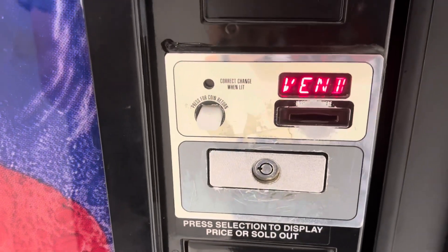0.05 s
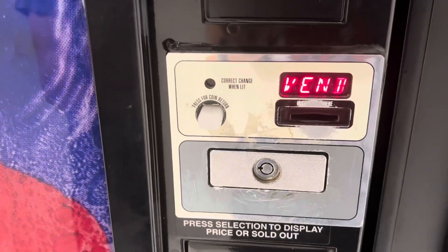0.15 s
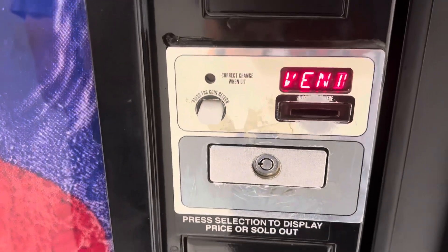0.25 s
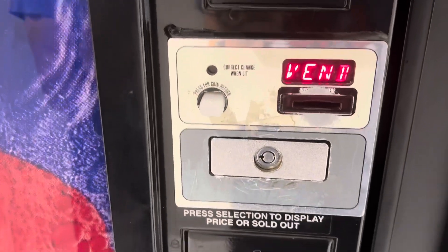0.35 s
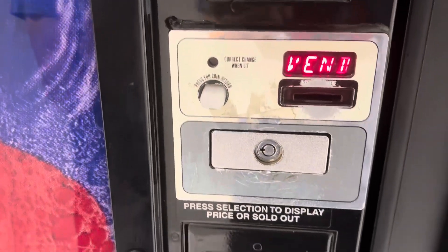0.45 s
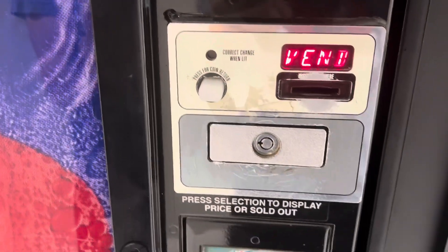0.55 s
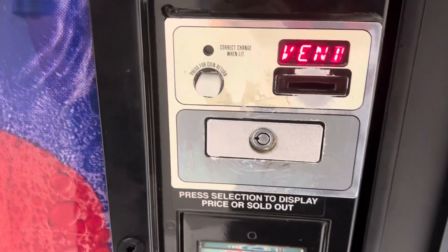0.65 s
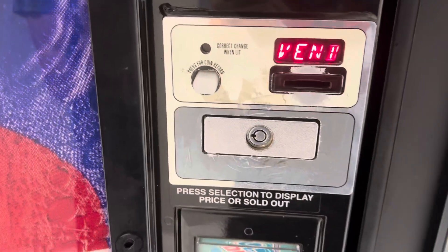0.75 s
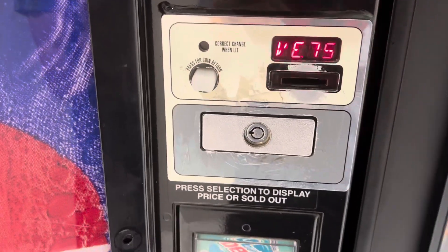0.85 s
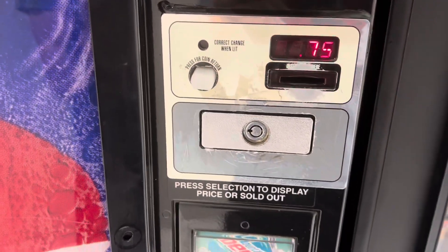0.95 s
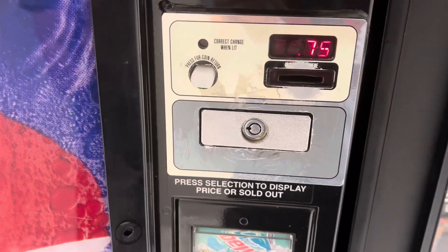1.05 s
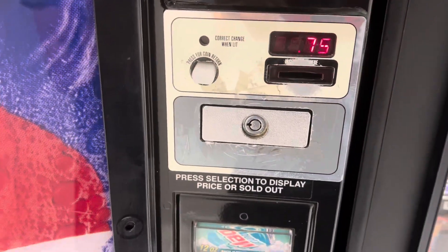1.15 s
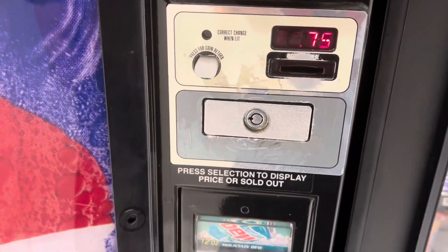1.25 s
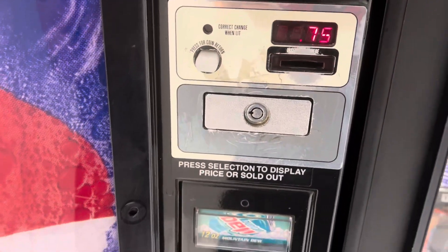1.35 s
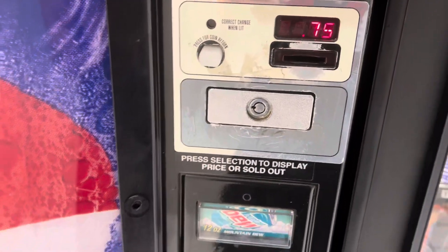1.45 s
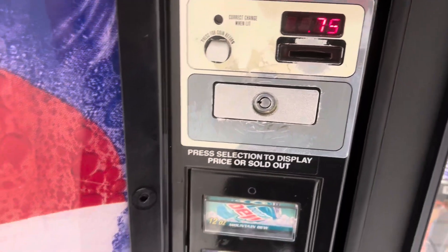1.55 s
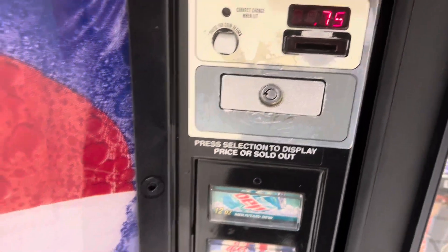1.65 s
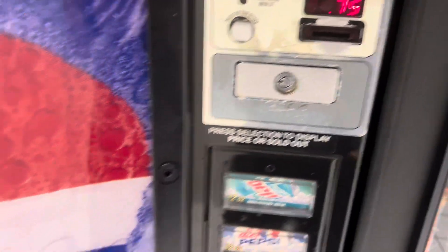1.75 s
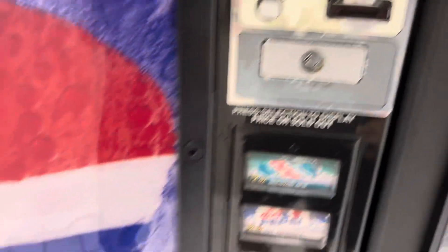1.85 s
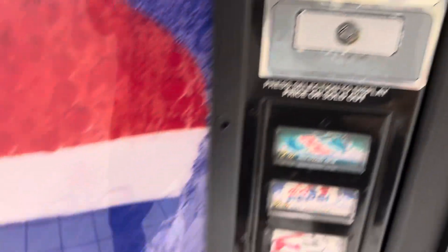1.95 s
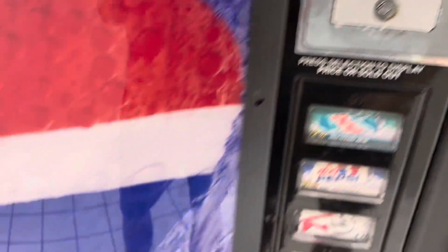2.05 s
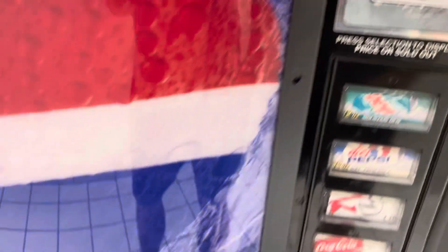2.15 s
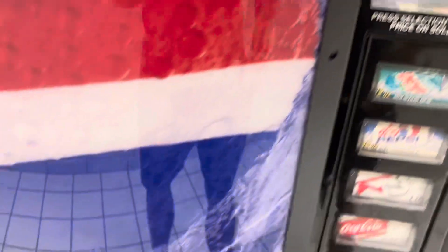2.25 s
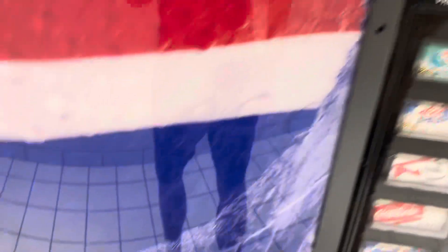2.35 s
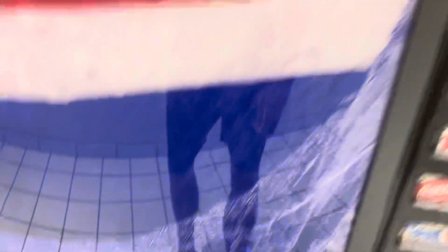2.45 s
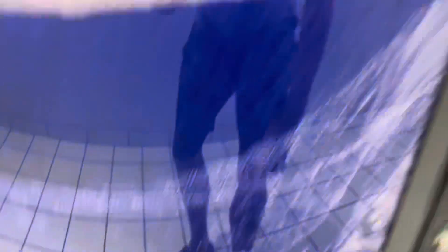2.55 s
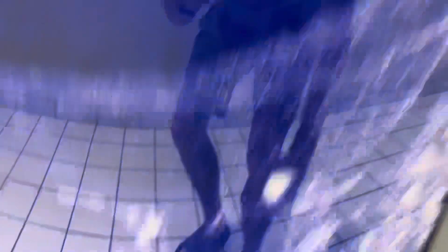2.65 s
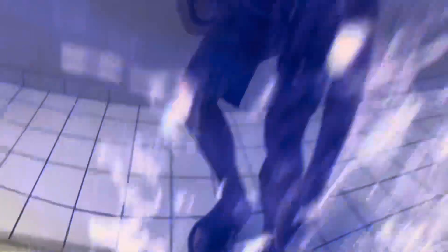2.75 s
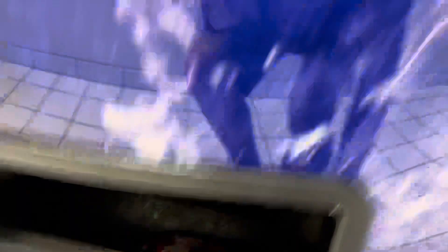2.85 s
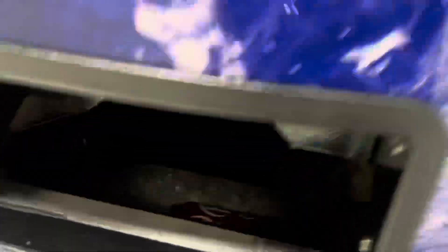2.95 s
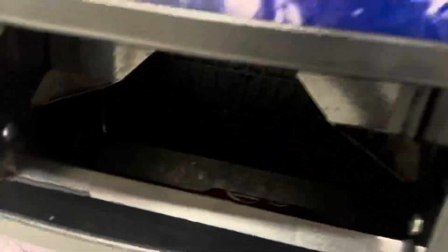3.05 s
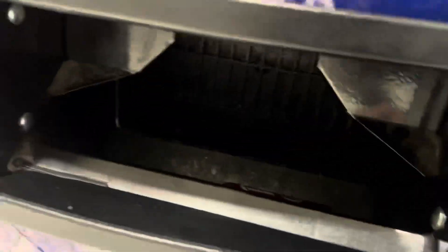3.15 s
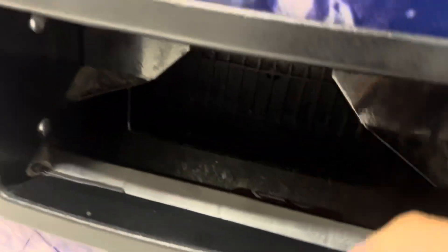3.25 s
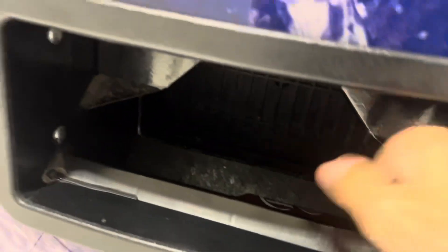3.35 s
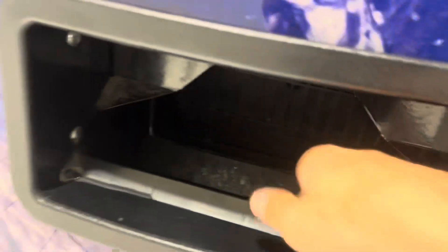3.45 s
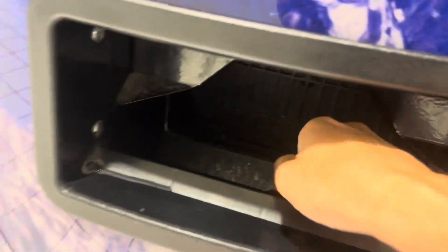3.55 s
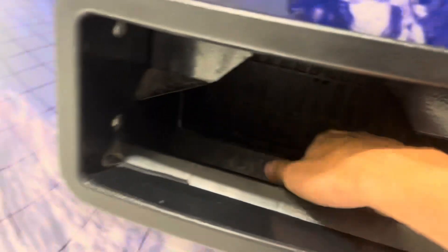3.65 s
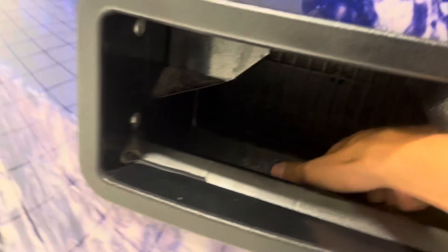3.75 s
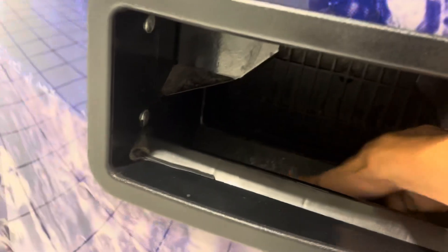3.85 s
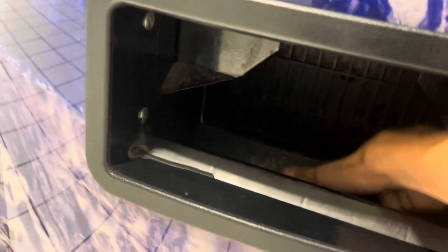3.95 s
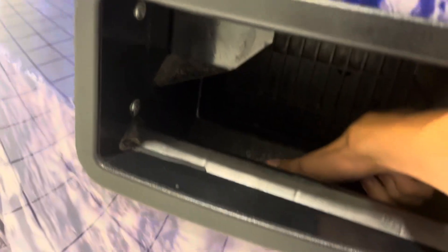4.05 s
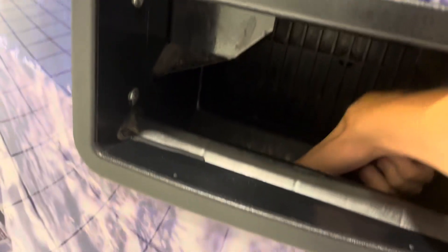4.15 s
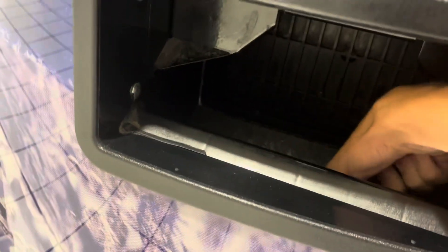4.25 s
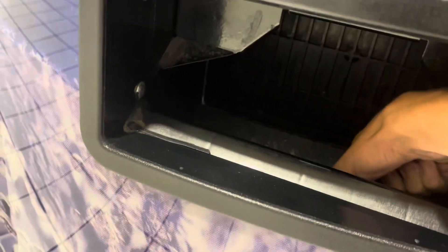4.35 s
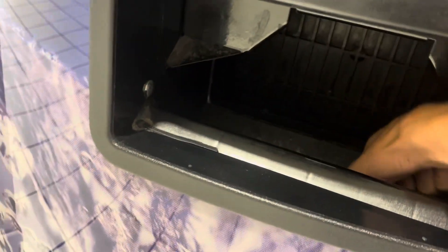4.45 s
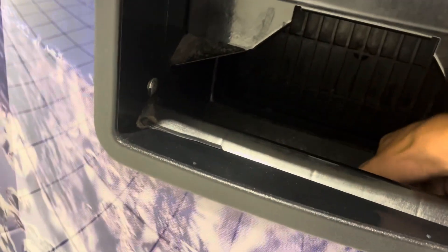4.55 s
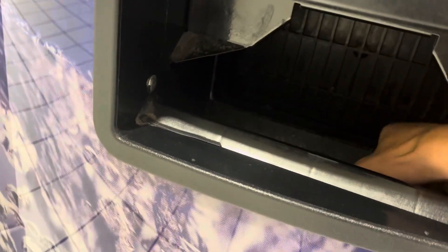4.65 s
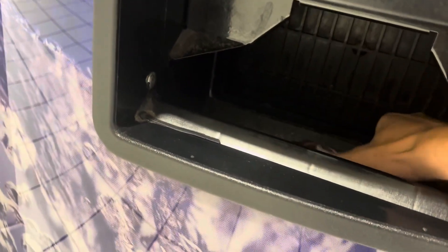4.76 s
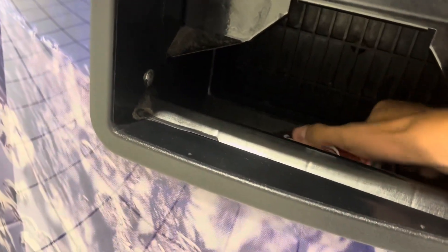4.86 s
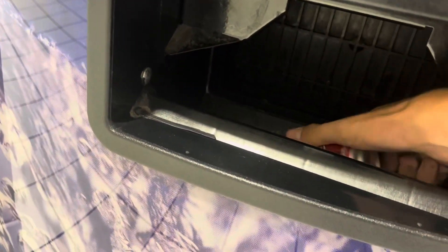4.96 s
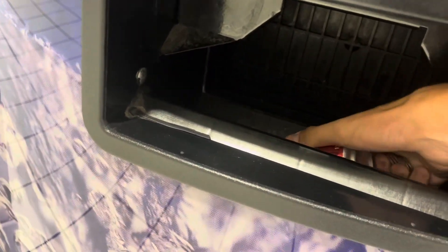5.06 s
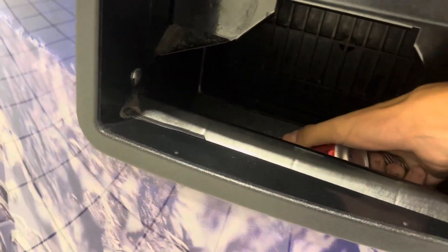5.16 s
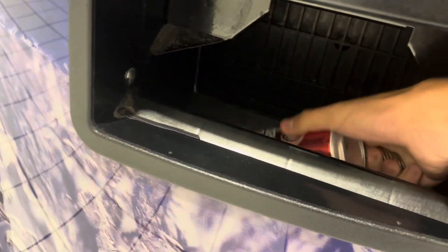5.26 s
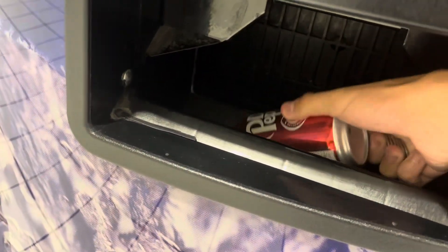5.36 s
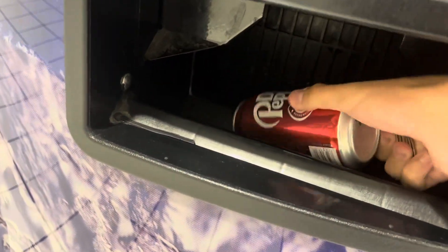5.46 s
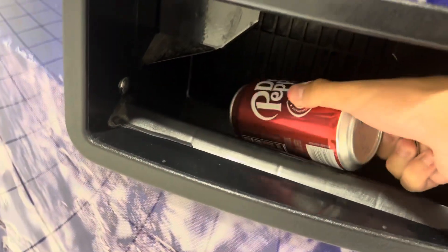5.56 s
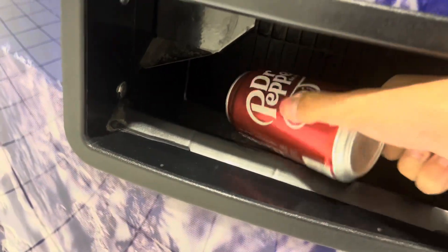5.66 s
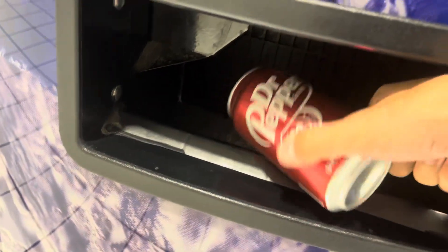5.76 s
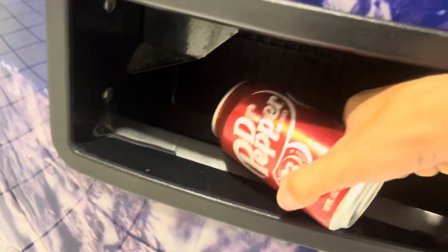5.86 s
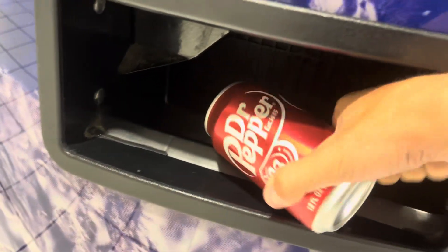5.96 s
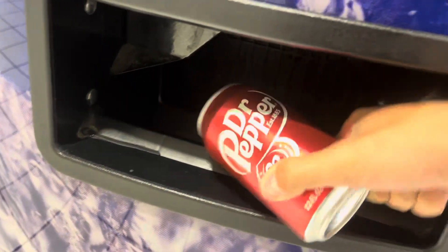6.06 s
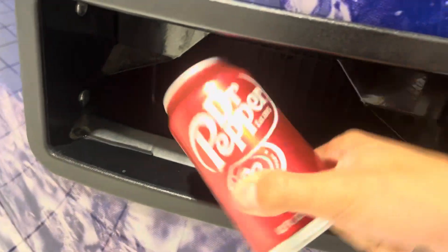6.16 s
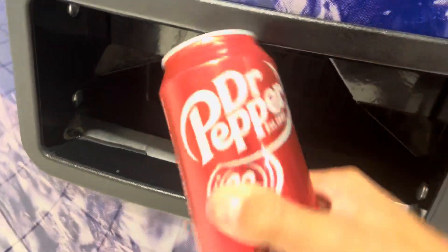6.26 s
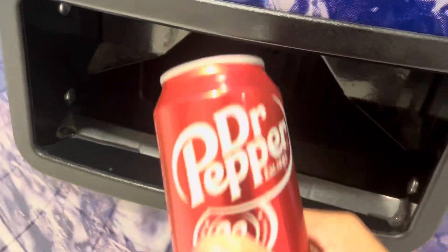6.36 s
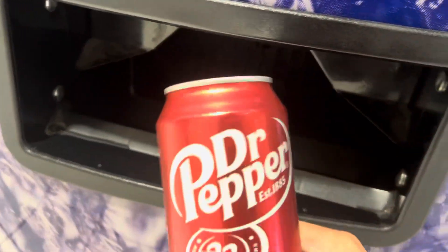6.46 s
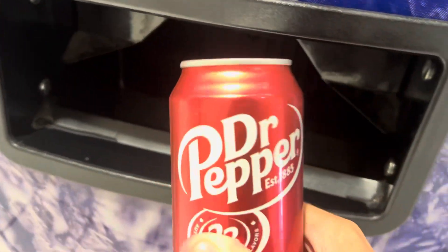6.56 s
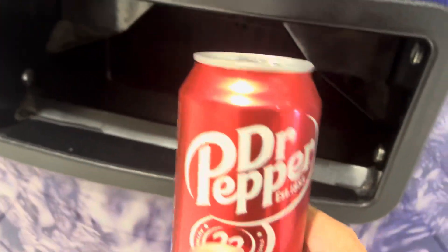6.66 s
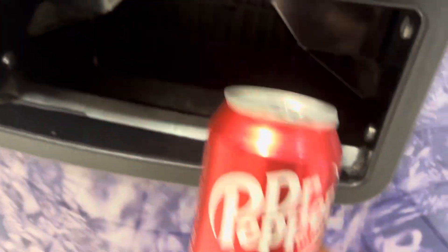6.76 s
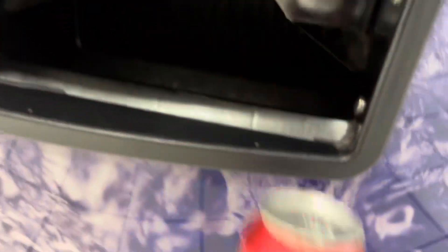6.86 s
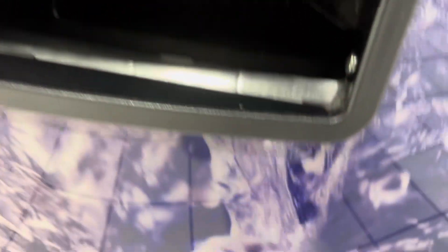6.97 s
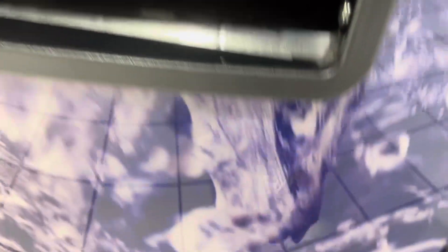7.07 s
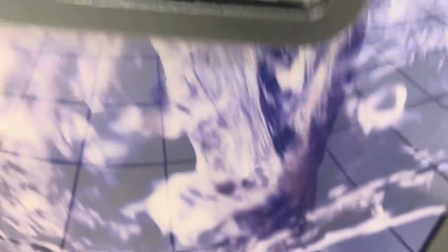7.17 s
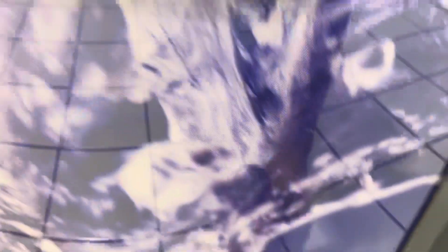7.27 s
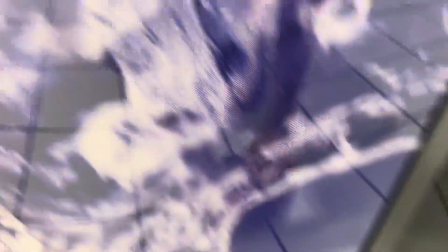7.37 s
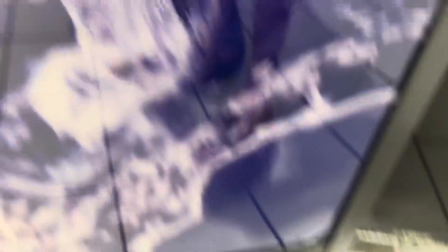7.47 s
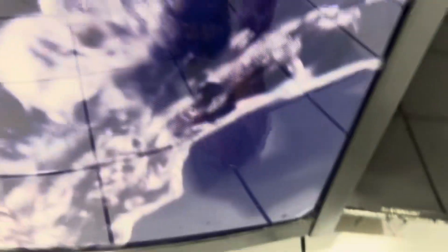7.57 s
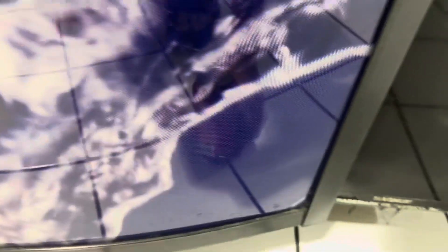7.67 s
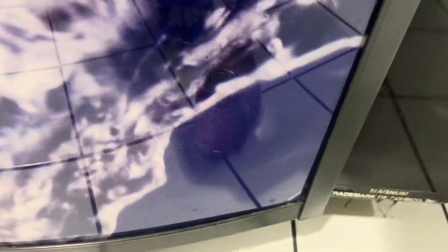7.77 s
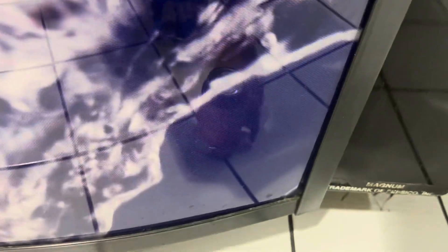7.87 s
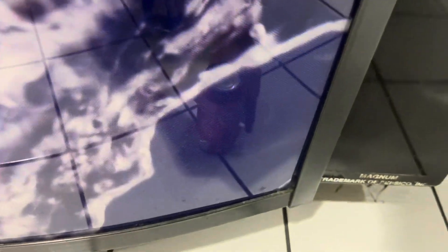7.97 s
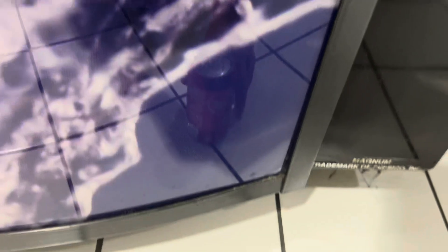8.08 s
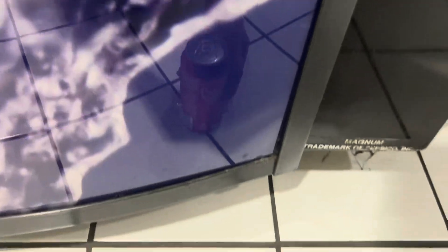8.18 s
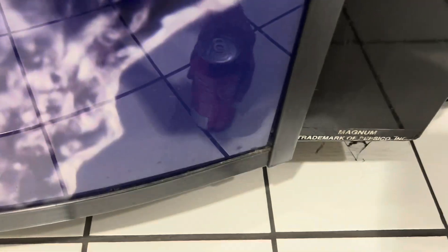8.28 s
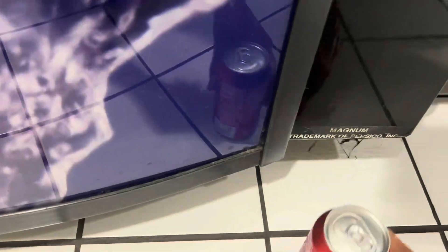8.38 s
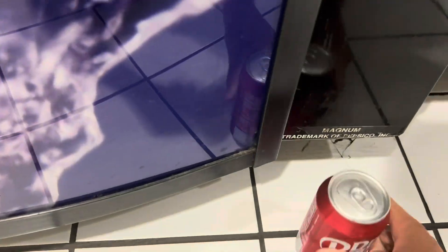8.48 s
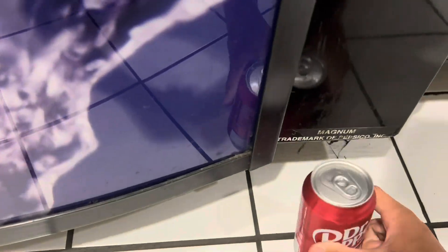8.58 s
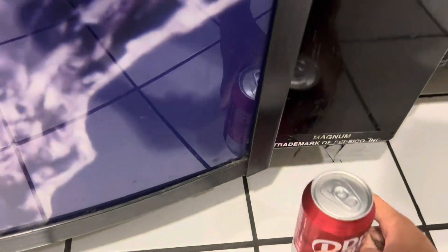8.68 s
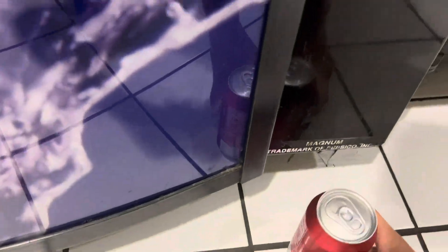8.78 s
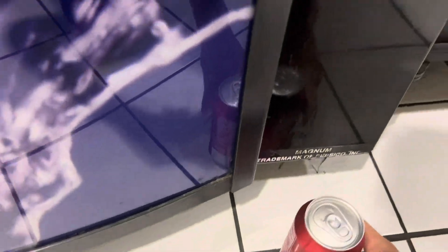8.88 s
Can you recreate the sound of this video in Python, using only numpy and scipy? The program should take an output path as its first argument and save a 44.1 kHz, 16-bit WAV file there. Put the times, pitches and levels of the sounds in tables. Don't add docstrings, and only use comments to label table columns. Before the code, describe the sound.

A drinks machine's low compressor hum and airy fan run throughout, swelling slightly as the listener stoops close to the vent. After about 0.6 seconds of hum alone, a full can tumbles down the chute: heavy hollow thuds and panel clatter, with hard metallic hits at 0.85, 1.0 and 1.15, loose metal rattling, and a weaker bump near 1.5. Then mostly hum with faint ticks until a sharp clank and deep thud at 3.35. Softer knocks come at 3.9 and 4.1 as a hand gropes and rubs. Booming bangs hit at 4.55 to 4.65 and, strongest, 4.95. Duller knocks at 5.85 and 6.25 mark the can being lifted. On tile, it clinks at 7.4, chatters brightly from 7.8 to 8.0, then scrapes and taps lightly from 8.15 to 8.5, with a last small clink near 8.75. Close, dry, handheld stereo sound indoors.

```python
import sys
import numpy as np
from scipy import signal
from scipy.fft import rfft, irfft, next_fast_len
from scipy.io import wavfile
from scipy.ndimage import uniform_filter1d, minimum_filter1d

SR = 44100
rng = np.random.default_rng(int(sys.argv[2]) if len(sys.argv) > 2 else 0)


def boost_factor(decibels):
    exponent = np.asarray(decibels, float) / 20
    return 10 ** exponent


def log_audio(samples):
    frames = np.atleast_2d(samples).T
    limited = np.clip(frames, -1, 1)
    pcm = np.round(limited * 32767).astype(np.int16)
    wavfile.write(sys.argv[1], SR, pcm)


N = 393357

# pitch_hz, level_db (rms), swing_db, crest_m (place in the room)
HUM_TONES = [(59.6, -46, 8.5, 0.69), (119.5, -44, 11.5, 0.33), (236, -45, 2.5, 0.41),
             (291.3, -40.5, 3, 0.48), (350.8, -45, 4, -0.187)]
# freq_hz, density_db (per Hz)
AIR_SPECTRA = [
    [(15, -43.5), (25, -15), (119, -6), (168, -10.5), (243, -11.5), (297, -17), (364, -14), (419, -23.5),
     (520, -23.5), (680, -45), (1140, -120)],
    [(280, -27), (480, -14), (624, -2.5), (714, -0.5), (801, -7), (987, -2), (1280, -3), (1550, -4.5),
     (1710, -6), (2210, -25.5), (2400, -47), (3120, -66), (5280, -120)],
    [(1290, -37.0), (2200, -11.5), (2490, -3.5), (2770, -8), (3400, -4.5), (4120, -11.0), (5050, -13.0),
     (5500, -19.0), (6550, -16.5), (8500, -20.5), (11000, -51), (18700, -120)][:-2] + [(11000, -11),
     (16000, -27)],
]
# level_db, nearness_share (dB gained per dB of nearness)
AIR_LEVELS = [
    (-33.5, 1),
    (-45, 0.24),
    (-57.5, 0.58),
]
# freq_hz, likeness (0 to 1)
AIR_LIKENESS = [(60, 1), (400, 0.88), (700, 0.58), (1400, 0.31), (2000, 0.92), (4500, 0.8), (7500, 1),
                (12000, .4)]
# freq_hz, left_lead_rad
FAN_LEAD = [(700, -0.18), (1000, -0.5), (1500, -4.5), (1900, 0.32)]
# freq_hz, left_minus_right_db
FAN_LEAN = [(600, 0), (1400, 5), (2000, 6.5), (2800, -0.5), (4000, 4.5), (6000, -0.5)]
# time_s, place_m, nearness_db (to the vent)
LISTENER_PATH = [(0, 0.04, -2.5), (1.6, 0.18, -4), (2.3, 0.34, -2.5), (2.75, 0.15, -1), (3.2, 0.47, -0.5),
                 (4.2, 0.45, 2.5), (5.8, 0.56, -1), (6.5, 0.53, -1), (7.2, 0.39, -0.5), (8, 0.29, 1),
                 (8.92, 0.92, 1)]
# start_s, length_s, level_db
RUBS = [
    (0, .01, -50),
    (8.47, .03, -52),
    (4.106, 0.2, -62),
    (5.193, 0.44, -60),
    (6.035, 0.051, -57),
]
# start_s, level_db, pitch_hz
TOUCHES = [(0.002, -36.5, 7500), (2.7178, -36.5, 5260), (2.825, -41.5, 3470), (3.524, -42, 3470),
           (3.5556, -42, 3900), (4.2523, -39.5, 3000), (4.279, -42, 3300), (4.4672, -42, 6900),
           (4.891, -38.5, 4100), (5.3555, -38.5, 3400), (6.0607, -45, 7000), (6.0791, -49, 3500),
           (6.41, -42.5, 3330), (8.599, -37, 3000), (8.712, -45, 5450), (8.488, -37, 4000),
           (8.9164, -35.5, 3250)]
# start_s, level_db, pitch_hz
RINGS = [(.85, -30, 1900), (.875, -27, 920), (.905, -34, 920), (.86, -25, 4800), (.93, -32, 4980),
         (0.996, -16, 1380), (1.03, -23, 2200), (1.142, -25, 620), (3.345, -35, 2120), (3.355, -38, 4400),
         (3.346, -38, 6300), (3.896, -34, 2620), (3.899, -42, 3740), (4.6, -47, 4220), (4.615, -45, 4200),
         (4.675, -44, 4120), (4.797, -30, 2060), (4.94, -16.5, 1627), (6.226, -36, 2410),
         (6.232, -42, 1580), (6.252, -33, 2050), (6.285, -40, 2250), (0.684, -20, 523)]
# start_s, level_db, pitch_hz
SNAPS = [(.925, -25, 8000), (.937, -22, 5000), (1.023, -22, 5000), (1.066, -16, 6500), (1.069, -18, 5500),
         (1.093, -25, 7000), (1.212, -33, 4700), (1.25, -38, 8000), (3.341, -25, 6040), (3.429, -37, 7500),
         (3.503, -37, 4500), (3.8997, -28.5, 3500), (4.892, -34.5, 7100), (4.961, -30, 3000),
         (6.24, -28, 7050), (6.297, -35.5, 7500), (8.4945, -27, 7000), (8.499, -29, 5000),
         (8.503, -28.5, 8200)]
# start_s, level_db, pitch_hz, t60_s
BOOMS = [(.63, -11.5, 259, .2), (0.854, -8, 310, .15), (4.129, -22.5, 385, .2), (4.411, -27.5, 382, .2),
         (4.56, -10, 289, .12), (1.25, -14.5, 385, 0.16), (0.624, -13, 301, .3), (.69, -14, 385, .3),
         (0.664, -12, 330, 0.22), (0.898, -9, 385, 0.14), (0.998, -6, 365.6, 0.45),
         (1.148, -5.5, 393.5, 0.27), (1.481, -20, 395, 0.33), (3.344, -18.5, 333.7, 0.55),
         (3.373, -9, 169.8, 0.2), (3.418, -19, 372, 0.32), (3.896, -13.5, 209.8, 0.29),
         (3.908, -16.5, 326, 0.39), (4.262, -22, 290, 0.22), (4.558, -2, 192, 0.15),
         (4.575, -11, 209.8, 0.39), (4.647, -4.5, 425, 0.12), (4.662, -17.5, 308, 0.18),
         (4.797, -13.5, 264.5, 0.17), (4.943, 2, 308.8, 0.29), (4.559, -4, 378, 0.17),
         (4.977, 0.5, 285, 0.21), (4.999, -10.5, 425, 0.4), (4.815, -15, 369, 0.11),
         (5.839, -13, 277, 0.24), (6.223, -13, 270.4, 0.41), (6.271, -22, 291, 0.083)]
# start_s, level_db, pitch_hz
THUDS = [(0.651, -17.5, 124), (0.852, -13, 131), (.962, -9, 119), (1.054, -10.5, 111.2), (4.563, -18, 96.3),
         (4.974, -16, 89.6), (5.035, -17.5, 80), (0.996, -7.5, 168.6), (1.151, -12.5, 132.7),
         (1.482, -19.5, 112.3), (3.347, -8.5, 69), (3.392, -7.5, 60.4), (3.454, -14, 62.9),
         (4.573, -30.5, 157), (4.643, -17.5, 95.5), (4.661, -14, 73), (5.002, -9.5, 77),
         (5.843, -18, 141.4), (6.23, -18.5, 106)]
# freq_hz, width_hz, level_db
CABINET_MODES = [(61, 6.5, -1.5), (80, 41, 11.5), (129.5, 32, 12.5), (170, 76, -2.5), (194.7, 20, 7),
                 (248.2, 29, -1), (297.2, 15.6, 11), (313.3, 66, 3), (385, 8.3, 11.5), (425, 12, -9),
                 (486, 54, -7.5)]
# freq_hz, width_hz, level_db
PANEL_MODES = [(670, 48, 13), (923, 9.7, 15.5), (1450, 58, -3), (1900, 54, -16)]
# freq_hz, width_hz, level_db
FLAP_MODES = [(920, 29, 6.5), (1550, 75, -3), (1904, 47, -4), (2420, 32, -3.5), (4700, 65, -14),
              (5200, 80, -10.5), (6120, 86, -15.5), (7940, 170, -6.5)]
# start_s, contact_s, shake_db, clatter_db, rattle_db
BUMPS = [(0.604, 0.069, -22, -26.5, -43), (0.84, 0.0074, -16.5, -36.5, -19.5), (0.9, 0.029, -25, -37, -25),
         (1, 0.054, -11, -22.5, -22.5), (1.049, 0.019, -28.5, -30.5, -28), (1.124, 0.073, -25, -32.5, -47),
         (1.2, 0.018, -27, -48, -38), (0.642, 0.057, -28, -28, -49.5), (4.96, 0.039, -21, -33.5, -46),
         (3.36, 0.053, -31, -40, -49), (1.254, 0.012, -21.5, -56, -35.5), (1.46, 0.012, -36, -58, -48.5)]
# rise_s, fall_db_per_s
BUMP_ANSWER = [
    (0.013, 93.5),
    (0.024, 152),
    (0.015, 208),
    (0.041, 105),
]
# freq_hz, density_db (per Hz)
CLATTER_SPECTRUM = [(260, -23.5), (450, -0.5), (684, -5), (827, -9.5), (1060, -8), (1290, -14.5),
                    (1390, -8), (1690, -13), (2600, -26.5), (3380, -37.5), (5720, -120)]
# freq_hz, density_db (per Hz)
RATTLE_SPECTRUM = [(1300, -22.5), (2200, -9), (3300, -4.5), (4400, -4), (5100, -3), (5700, -8),
                   (7600, -4.5), (8600, -4), (16000, -6.5)]
# freq_hz, density_db (per Hz)
TICK_SPECTRUM = [(1500, -23.5), (2300, -4), (4000, -3.5), (5500, -12.5), (8500, -14), (11000, -14),
                 (16000, -17)]
# start_s, tick_db, clack_db, low_ring_hz, high_ring_hz
KNOCKS = [(0.854, -19, -25, 950, 4640), (0.996, -12, -7.5, 695, 1900), (1.1374, -32, -19.5, 1000, 1900),
          (1.2384, -34, -32.5, 970, 4720), (1.47, -39.5, -52, 670, 4230), (3.343, -14.5, -25, 1260, 2040),
          (3.3753, -27.5, -30.5, 785, 1950), (3.412, -32.5, -30.5, 695, 1900),
          (3.4364, -29.5, -33.5, 686, 2620), (3.8941, -38.5, -18.5, 736, 1900),
          (4.125, -54, -31.5, 710, 2240), (4.554, -21.5, -15, 895, 2420), (4.646, -22.5, -16, 740, 2680),
          (4.7947, -27.5, -21, 2213, 1220), (4.9385, -7, -5.5, 1162, 2830), (4.961, -38, -20, 1610, 3000),
          (4.975, -25, -16, 1160, 2520), (4.9992, -61, -21.5, 670, 2430), (5.8364, -32.5, -28, 940, 1950),
          (6.2191, -27, -23.5, 800, 2120), (6.229, -19, -27, 1560, 2110), (6.2694, -35.5, -30, 670, 2200)]
# start_s, body_db, low_ring_db, low_ring_hz, high_ring_db
TILE_TAPS = [(7.393, -22.5, -15, 858, -15.5), (7.42, -26, -26.5, 1540, -24), (7.4381, -26, -22, 880, -37),
             (7.45, -29, -29, 910, -26), (7.462, -32, -33, 1950, -33), (7.47, -30, -38.5, 1950, -31),
             (7.486, -35, -35, 1950, -32), (7.498, -33, -40, 1950, -39), (7.511, -41, -43, 1950, -35),
             (7.788, -15, -18.5, 1950, -16.5), (7.79, -28, -17, 1283, -48), (7.8106, -16, -45, 2120, -23),
             (7.8224, -15, -34, 2100, -29), (7.856, -19, -41, 1950, -39), (7.886, -21, -39, 1290, -33),
             (7.8478, -16, -29, 1950, -18.5), (7.878, -17, -35.5, 1330, -21.5),
             (7.9025, -17, -27, 1280, -31), (7.9265, -21, -29, 1320, -24), (7.9426, -20, -36, 1400, -30),
             (7.958, -23, -33, 1330, -32), (7.967, -29, -39, 1310, -36), (7.975, -33, -41.5, 1310, -39),
             (7.995, -36, -45, 1330, -42), (7.615, -33.5, -44, 1310, -52), (7.6242, -32.5, -48, 1310, -50),
             (8.1496, -40, -47, 1320, -43), (8.195, -32, -35, 1500, -39), (8.2254, -40, -48, 1300, -34),
             (8.2464, -27, -25, 2220, -21), (8.256, -25, -35.5, 1300, -27), (8.362, -24, -46, 1310, -28),
             (8.441, -28, -33, 1290, -46), (8.466, -42, -29.5, 2220, -47), (8.285, -20.5, -19.5, 1350, -22),
             (8.4082, -19.5, -31.5, 1130, -41), (8.482, -40, -18.5, 1245, -33),
             (8.7616, -26, -19, 1240, -56), (8.7837, -39, -25.5, 1310, -42)]
# start_s, length_s, body_db, low_ring_db, high_ring_db
DRAGS = [(7.437, 0.093, -42.5, -51, -49), (7.575, 0.024, -45, -59, -50), (7.832, 0.15, -38.5, -41, -49),
         (7.966, 0.046, -51.5, -50, -57), (8.091, .05, -52, -55, -55), (8.132, 0.24, -46, -49, -50.5),
         (8.197, 0.11, -34, -41, -44), (8.287, 0.019, -31.5, -36.5, -45), (8.314, 0.12, -33.5, -41, -45),
         (8.426, 0.043, -35.5, -31.5, -43.5), (8.738, 0.031, -35.5, -30, -44)]
# freq_hz, width_hz, level_db
CAN_MODES = [(2200, 160, -7), (2615, 80, 3.5), (2817, 210, -2.5), (3800, 250, -8), (4730, 294, 3),
             (5100, 190, 3), (6500, 680, -23), (7650, 400, -26), (12200, 1700, -18), (560, 420, -5),
             (880, 110, -15), (1173, 62, 1.5), (1690, 52, -9.5), (1950, 48, 1)]
# freq_hz, left_lead_rad
PORT_LEAD = [(100, 0.15), (400, 0.38), (700, 0.62), (1400, 1.05), (2000, 0), (2800, 0.81), (4000, 0.38),
             (5000, 0.74), (7500, 0), (8500, -2.5), (9500, -0.5), (12000, -6)]
# freq_hz, left_minus_right_db
PORT_LEAN = [(300, 0.7), (1000, -2), (2000, 0), (2800, 2.5), (4000, 2), (6000, 0.5), (9000, 1)]
# freq_hz, gain_db
STEADY_COLOUR = [(25, -9), (45, -.5), (8500, 0), (9000, -7), (9400, -20), (9700, -40), (10800, -40),
                 (11000, -15), (12500, -14), (14400, -24), (15700, -45)]
# freq_hz, gain_db
ATTACK_COLOUR = [(25, -15), (45, 1), (8500, 1), (9500, -14.5), (10500, -7.5), (12500, -14),
                 (14400, -26), (15700, -51)]

SOUND_M_PER_S = 343
THUD_T60_S, THUD_UNDER_SHAKE_DB = 0.2, -1
VEND_END_S = 1.1
ROLL_FALLING_S, ROLL_HELD_S = 0.46, 0.18
CAN_LOW_HZ, FIRST_RIM_HZ, RIM_HZ = 1312, 5280, 4554
STROKE_RISE_S, STROKE_FALL_DB_PER_S = 0.034, 351
SPARSE_HZ, FAINT_DB, STAND_OUT = 8900, -111, 1.25
SUDDEN_DB, OPEN_S = 11, 0.014


def evened(x):
    return x / np.sqrt(np.mean(x ** 2) + 1e-20)


def peaked(x):
    return x / abs(x).max()


def read(points, hz):
    f, value = np.transpose(points)
    return np.interp(np.log(hz + 1), np.log(f + 1), value)


def add(mix, s, sound):
    part = mix[..., round(s * SR):][..., :sound.shape[-1]]
    part += sound[..., :part.shape[-1]]


def shaped(x, gain):
    size = next_fast_len(x.shape[-1])
    spectrum = rfft(x, size) * gain(np.fft.rfftfreq(size, 1 / SR))
    return irfft(spectrum, size)[..., :x.shape[-1]]


def colour(x, points):
    return evened(shaped(x, lambda hz: boost_factor(read(points, hz))))


def resonate(x, hz, width):
    r = np.exp(-np.pi * width / SR)
    return 2 * signal.lfilter([1 - r], [1, -r * np.exp(2j * np.pi * hz / SR)], x).real


def resonate_twice(x, hz, width):
    return resonate(resonate(x, hz, width), hz, width)


def modes(x, table):
    return sum((-1) ** k * boost_factor(db) * resonate(x, hz, width) for k, (hz, width, db) in enumerate(table))


def pair(same):
    a, b = rng.standard_normal((2, N))
    side = np.sqrt((1 - np.clip(same, 0, 1)) / 2)
    return np.sqrt(1 - side ** 2) * a + side * b * np.array([[1], [-1]])


def grit(per_s, spread_db):
    return boost_factor(spread_db * np.minimum(rng.exponential(1, N), 4)) * (rng.random(N) < per_s / SR)


def strike(t, t60):
    a, b = boost_factor(-60 * t / t60) * rng.standard_normal((2, len(t)))
    return np.array([a + 0.26 * b, a - 0.22 * b])


def strokes(starts, lengths, dbs, rise_s, fall_db_s):
    t, power = np.arange(SR // 2) / SR, np.zeros(N)
    for s, length, db in zip(starts, lengths, dbs):
        rise = np.minimum(t / rise_s, 1) ** 2
        fall = boost_factor(db - fall_db_s * np.maximum(t - length, 0))
        add(power, s, (rise * fall) ** 2)
    return np.sqrt(power)


def ring_out(t, hz, db, t60, turn):
    fade = boost_factor(db - 60 * t / (np.clip(t60, .03, 1) * (300 / hz) ** 0.47))
    return (1 - np.exp(-t * hz * 3.3)) ** 2 * fade * np.sin(2 * np.pi * (hz * t + turn))


def along(column):
    return np.interp(np.arange(N) / SR, *np.transpose(LISTENER_PATH)[[0, column]])


def ports(x, lead, lean):
    half = np.array([[.5], [-.5]])
    return shaped(x, lambda hz: np.exp(1j * half * read(lead, hz)) * boost_factor(half * read(lean, hz)))


def hum():
    t, out, place = np.arange(N) / SR, np.zeros(N), along(column=1)
    for hz, db, swing_db, crest in HUM_TONES:
        gain = boost_factor(db + swing_db * np.cos(2 * 2 * np.pi * hz * (place - crest) / SOUND_M_PER_S))
        waver = sum(np.sin(2 * np.pi * (f * t + rng.random())) / f for f in np.geomspace(.4, 5, 8))
        out += np.sqrt(2) * gain * np.sin(2 * np.pi * (hz * t + 0.15 * waver))
    return out


def fan():
    frames, hz = N // 512 + 5, np.fft.rfftfreq(2048, 1 / SR)
    a, b, c, d, patches = rng.standard_normal((frames, 1025, 5)).T
    patches = evened(uniform_filter1d(uniform_filter1d(patches, 8, 0), 8, 1))
    same = np.clip(read(AIR_LIKENESS, hz), -1, 1)[:, None]
    left = a + 1j * b
    right = same * left + np.sqrt(1 - same ** 2) * (c + 1j * d)
    z = boost_factor(2.34 * patches) * np.array([left, right])
    near_db, out = along(column=2), np.zeros((2, N))
    for spectrum, (db, share) in zip(AIR_SPECTRA, AIR_LEVELS):
        coloured = z * boost_factor(read(spectrum, hz))[:, None]
        layer = signal.istft(coloured, nperseg=2048, noverlap=1536)[1][:, :N]
        out += evened(layer) * boost_factor(db + share * near_db)
    return out


def rubs():
    skin = (1 + evened(uniform_filter1d(grit(200, 3.6), 300))) * pair(.9)
    return strokes(*np.transpose(RUBS), 0.042, 200) * colour(skin, RATTLE_SPECTRUM)


def touches():
    t, out = np.arange(2000) / SR, np.zeros((2, N))
    for s, db, hz in TOUCHES:
        scratch = strike(t, 0.06) * (1 - np.exp(-t / 0.00075))
        edge = peaked(np.diff(scratch, prepend=0))
        add(out, s, boost_factor(db) * peaked(peaked(resonate(scratch, hz, 900)) + .5 * edge))
    for s, db, hz in RINGS:
        add(out, s, boost_factor(db) * peaked(resonate_twice(strike(t, 0.025), hz, 97)))
    for s, db, hz in SNAPS:
        snap = strike(t, .012)
        edge = peaked(np.diff(snap, prepend=0))
        add(out, s, boost_factor(db) * peaked(peaked(resonate(snap, hz, 1400)) + .8 * edge))
    return out


def booms():
    t, out = np.arange(SR // 2) / SR, np.zeros(N)
    phases = rng.random((len(BOOMS), 1 + len(CABINET_MODES)))
    for (s, boom_db, boom_hz, t60), phase in zip(BOOMS, phases):
        rings = [(boom_hz, boom_db - 6.5)]
        for hz, width, db in CABINET_MODES:
            octaves_off = abs(np.log2(hz / boom_hz))
            rings.append((hz, boom_db - 15.0 + db - 12 * octaves_off))
        add(out, s, sum(ring_out(t, hz, db, t60, turn) for (hz, db), turn in zip(rings, phase)))
    for s, db, hz in THUDS:
        add(out, s, ring_out(t, hz, db, THUD_T60_S, turn=0))
    return out


def tumble():
    s, length, *dbs = np.transpose(BUMPS)
    dbs.append(dbs[0] + THUD_UNDER_SHAKE_DB)
    shake, clatter, rattle, thud = (strokes(s, length, db, *way) for db, way in zip(dbs, BUMP_ANSWER))
    blows = rng.standard_normal(N) * (1 + evened(grit(400, 2.0)))
    hits = (2 + evened(uniform_filter1d(grit(600, 2.2), 140))) * pair(.8)
    cabinet = shake * evened(modes(blows, CABINET_MODES[3:])) + thud * evened(modes(blows, CABINET_MODES[:3]))
    panels = evened(colour(hits, CLATTER_SPECTRUM) + 0.41 * evened(modes(hits, PANEL_MODES)))
    metal = colour(hits, RATTLE_SPECTRUM) + 0.67 * evened(modes(hits, FLAP_MODES))
    return cabinet + clatter * panels + rattle * metal


def knocks():
    t, out = np.arange(SR // 2) / SR, np.zeros((2, N))
    noise = pair(0.89)
    bright, hollow = colour(noise, TICK_SPECTRUM), colour(noise, CLATTER_SPECTRUM)
    rise = 1 - np.exp(-t / 0.0023)
    for s, tick_db, clack_db, ring_hz, high_hz in KNOCKS:
        t60 = ROLL_FALLING_S if s < VEND_END_S else ROLL_HELD_S
        part = slice(round(s * SR), round(s * SR) + len(t))
        roll = boost_factor(-8.0 - 60 * t / np.clip(t60, .03, .5))
        blow = strike(t, 0.012) + 0.15 * roll * noise[:, part]
        tick = (boost_factor(-60 * t / 0.026) + roll) * bright[:, part]
        tick += 0.28 * peaked(modes(blow, CAN_MODES[:8]))
        tick += 2.2 * peaked(resonate_twice(blow, high_hz, 420))
        ring = peaked(resonate(blow, ring_hz, 65)) + 0.37 * peaked(modes(blow, CAN_MODES[9:]))
        clack = (boost_factor(-60 * t / 0.12) + 2.9 * roll) * hollow[:, part] + 5.2 * ring
        add(out, s, rise * (boost_factor(tick_db - 9.0) * tick + boost_factor(clack_db - 13.0) * clack))
    return out


def tile_taps():
    t, out = np.arange(5000) / SR, np.zeros((2, N))
    for s, db, low_db, low_hz, high_db in TILE_TAPS:
        rim_hz = FIRST_RIM_HZ if s == TILE_TAPS[0][0] else RIM_HZ
        chatter = 0.05 * strike(t, 0.06)
        blow = (1 - np.exp(-t / .0009)) * (strike(t, 0.009) + chatter)
        body = peaked(modes(blow, CAN_MODES[:3]))
        low = peaked(resonate_twice(blow, low_hz, 150)) + 1.32 * peaked(modes(blow, CAN_MODES[9:]))
        high = peaked(resonate_twice(blow, rim_hz, 240)) + 0.97 * peaked(modes(blow, CAN_MODES[3:9]))
        high += 0.27 * peaked(resonate(blow, 7660, 500))
        add(out, s, boost_factor(db) * body + boost_factor(low_db - 3) * low + boost_factor(high_db - 4.5) * high)
    return out


def rim_drag():
    s, length, *dbs = np.transpose(DRAGS)
    body_gain, low_gain, high_gain = (
        strokes(s, length, db, STROKE_RISE_S, STROKE_FALL_DB_PER_S) for db in dbs)
    slips = (1.5 + evened(uniform_filter1d(grit(450, 2.5), 70))) * pair(.93)
    body = evened(modes(slips, CAN_MODES[:3]) + 0.14 * resonate(slips, 2000, 1400))
    high = evened(modes(slips, CAN_MODES[3:9]) + 0.045 * resonate(slips, 6700, 3000))
    low = evened(resonate_twice(slips, CAN_LOW_HZ, 190))
    return body_gain * body + high_gain * high + low_gain * low


def scene():
    air = ports(fan(), FAN_LEAD, FAN_LEAN) + hum()
    close = touches() + booms() + tumble() + knocks() + tile_taps() + rim_drag()
    return ports(air + rubs() + close, PORT_LEAD, PORT_LEAN)


def ducked_by_blows(x):
    power_db = 10 * np.log10(abs(uniform_filter1d((x ** 2).mean(0), 400)) + 1e-12)
    recovery_db = np.arange(N) * 30 / SR
    held_db = np.maximum.accumulate(power_db + recovery_db) - recovery_db
    over_db = np.maximum(held_db + 6.5, 0)
    return np.tanh(x / boost_factor(.7 * uniform_filter1d(over_db, 300)))


def thinned(x):
    hz, t, z = signal.stft(x, SR, nperseg=1024)
    strength = abs(z).mean(0)
    floor = np.maximum(boost_factor(FAINT_DB), STAND_OUT * uniform_filter1d(strength, size=24, axis=0))
    keep = (strength > floor) | (hz < SPARSE_HZ)[:, None]
    return signal.istft(z * keep, SR, nperseg=1024)[1][:, :N]


def sudden(x):
    power = np.diff(x.mean(0), 2, prepend=0, append=0) ** 2
    before = np.roll(uniform_filter1d(power, size=600), 450)
    jump = 1. * (uniform_filter1d(power, size=150) > boost_factor(2 * SUDDEN_DB) * before)
    held = 1 - minimum_filter1d(1 - jump, size=round(OPEN_S * SR), origin=round(OPEN_S * SR / 4))
    return uniform_filter1d(held, size=100)


def band_limit(x):
    return signal.sosfilt(signal.butter(12, 15600, fs=SR, output="sos"), x)


def record(dry):
    ducked = ducked_by_blows(dry)
    steady = thinned(shaped(ducked, lambda hz: boost_factor(read(STEADY_COLOUR, hz))))
    attack = shaped(ducked, lambda hz: boost_factor(read(ATTACK_COLOUR, hz)))
    opened = sudden(ducked)
    return band_limit((1 - opened) * steady + opened * attack)


dry = scene()
out = record(dry)
log_audio(out)
```